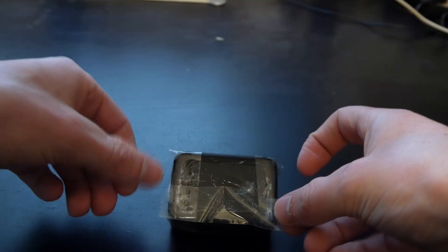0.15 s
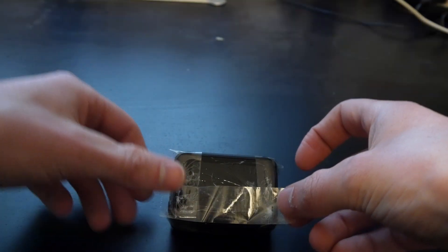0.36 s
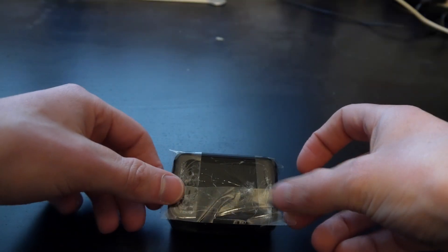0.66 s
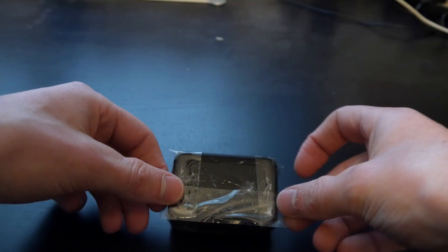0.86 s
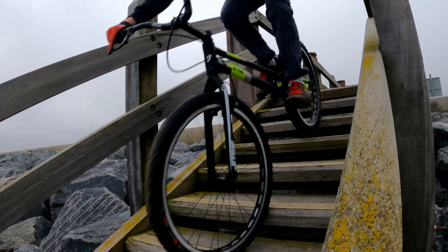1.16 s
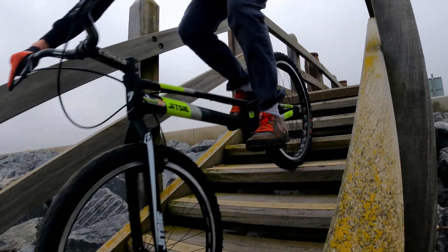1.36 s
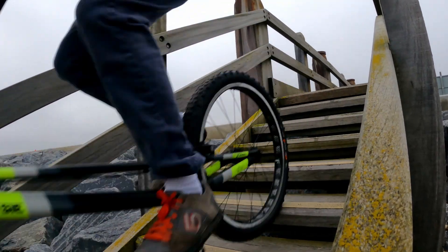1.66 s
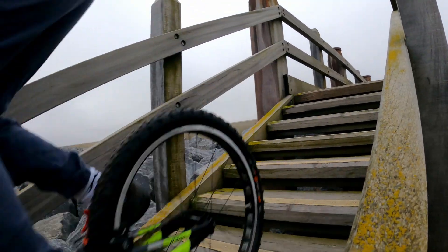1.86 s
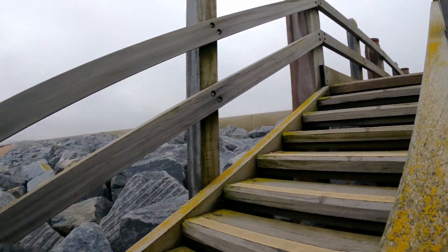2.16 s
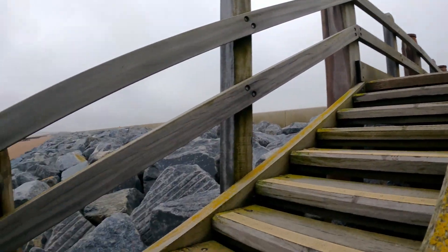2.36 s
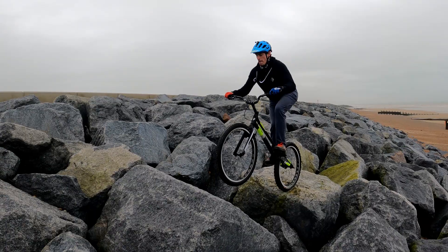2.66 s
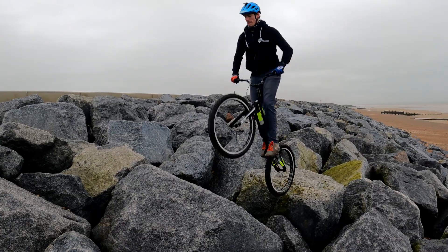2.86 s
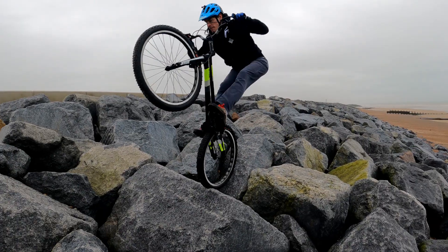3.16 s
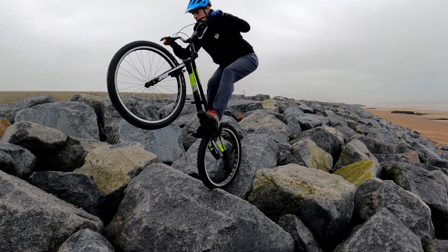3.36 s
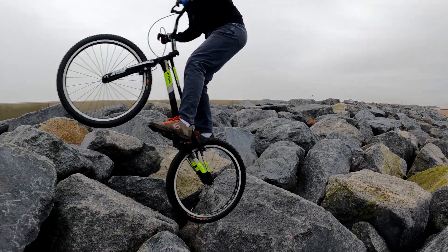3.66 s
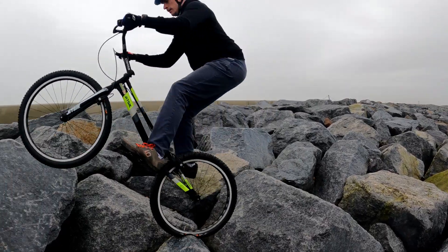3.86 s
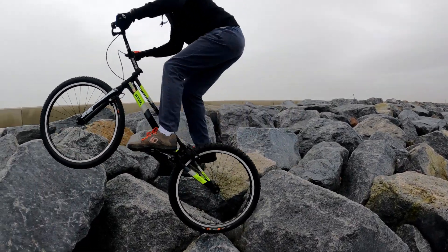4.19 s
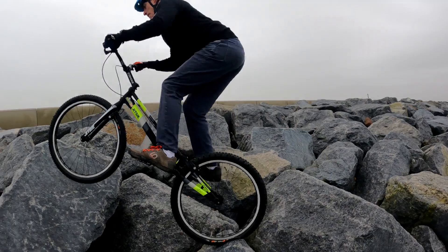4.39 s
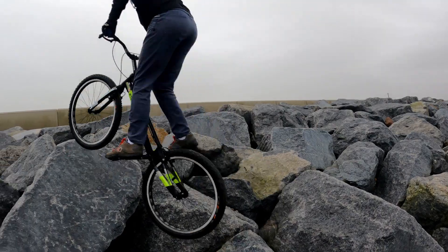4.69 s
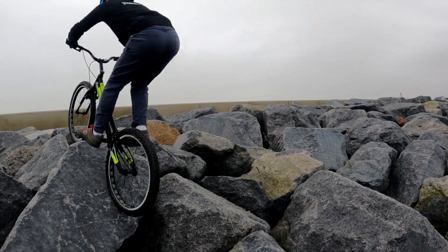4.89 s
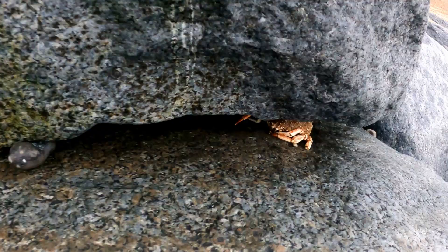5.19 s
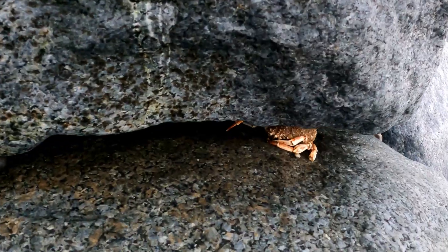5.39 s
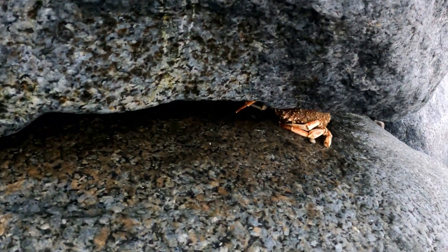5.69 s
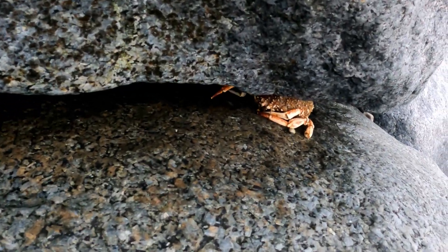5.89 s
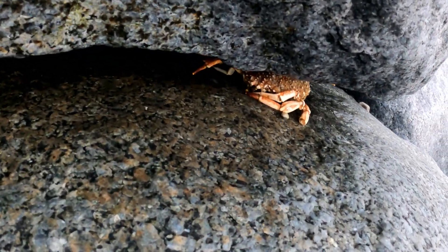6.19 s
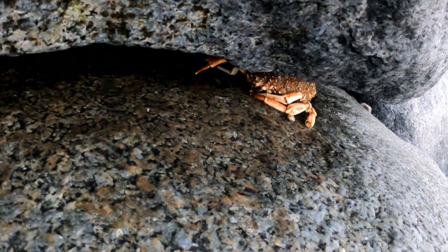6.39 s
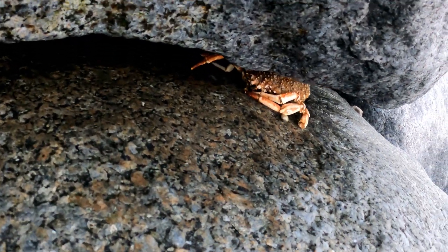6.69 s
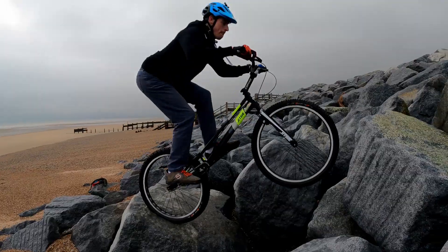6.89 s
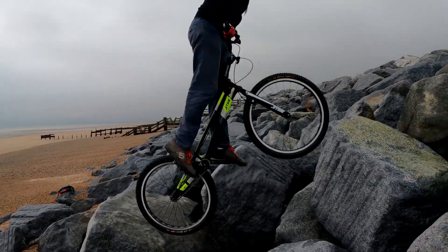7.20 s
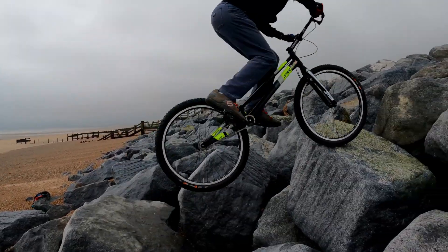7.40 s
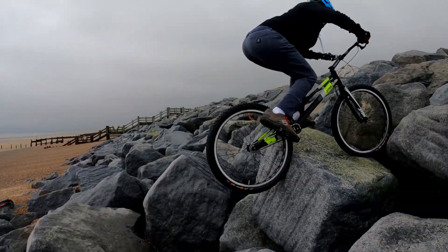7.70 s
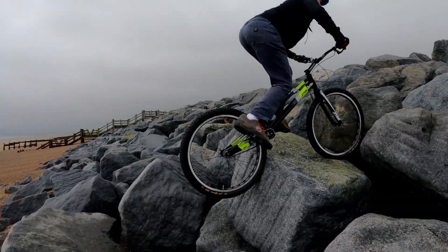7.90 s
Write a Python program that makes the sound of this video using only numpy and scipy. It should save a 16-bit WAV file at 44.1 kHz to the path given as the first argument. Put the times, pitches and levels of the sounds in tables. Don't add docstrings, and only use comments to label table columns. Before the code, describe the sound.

Close, raw outdoor sound after a second of room hum with tape crackles and one soft thump. Bike pads squeal around one kilohertz as tyres thud and loose parts rattle down planks. Gusting wind opens the boulder section, with squeals, rim knocks, chain clacks and whirring freewheel. Low sea drone and crab scrabbles follow, then more hopping and a last harsh shriek of brakes.

```python
import sys
import numpy as np
from scipy import signal
from scipy.fft import rfft, irfft
from scipy.io import wavfile

SR = 44100
rng = np.random.default_rng(int(sys.argv[2]) if len(sys.argv) > 2 else 0)


def dump(signal):
    limited = np.clip(np.atleast_2d(signal).T, -1, 1)
    pcm = np.round(limited * 32767).astype(np.int16)
    wavfile.write(sys.argv[1], SR, pcm)


def rack_gain(trim_db):
    fader = np.asarray(trim_db, float)
    return 10 ** (fader / 20)


N = 355005

CUT_S, CRANNY_S = 2.427, 5.2288


def rms_one(x):
    return x / np.sqrt(np.mean(x ** 2) + 1e-20)


def peak_one(x):
    return x / np.abs(x).max()


def in_time(rows, fade=0.003):
    s, *columns = np.transpose(rows)
    t = np.arange(N) / SR
    gate = np.clip(np.minimum(t - s[0], s[-1] - t) / fade + 1, 0, 1)
    return [gate] + [np.interp(t, s, c) for c in columns]


def drift(rate, size=None):
    size = size or N
    knots = rng.standard_normal(int(N / SR * rate) + 3)
    return 1.24 * np.interp(np.arange(size) * rate / SR, np.arange(len(knots)), knots)


def coloured(x, spectrum):
    hz, db = np.transpose(spectrum)
    grid = np.fft.rfftfreq(N, 1 / SR) + 1
    gain = rack_gain(np.interp(np.log(grid), np.log(hz), db))
    return rms_one(irfft(rfft(x) * gain, N))


def band(x, low_hz, high_hz):
    return rms_one(signal.sosfilt(signal.butter(2, [low_hz, high_hz], "band", fs=SR, output="sos"), x))


def dull(x, top_hz):
    return signal.sosfilt(signal.butter(4, top_hz, fs=SR, output="sos"), x)


def resonance(x, hz, width_hz):
    r = np.exp(-np.pi * np.clip(width_hz, 5, 9000) / SR)
    return signal.lfilter(np.array([1, 0, -1]) * (1 - r * r) / 2, [1, -2 * r * np.cos(2 * np.pi * hz / SR), r * r], x)


def grains(per_s, spread_db, size=None):
    chance, size_draw, sign_draw = rng.random((3, size or N))
    loudness = rack_gain(-spread_db * np.log(size_draw + 0.0012))
    return (chance < per_s / SR) * loudness * np.sign(sign_draw - .5)


def add(out, s, piece):
    at = round(s * SR)
    out[at:at + len(piece)] += piece[:N - at]


def brakes():
    # start in seconds, length in seconds, first and last pitch in Hz, level in dB.
    pure = [(1.441, 0.041, 1150, 1139, -10), (1.624, 0.041, 1142, 1160, -9),
            (1.787, 0.045, 1157, 1135, -13.5), (1.789, .04, 1080, 1080, -22.5),
            (1.843, 0.046, 1155, 1152, -21), (1.843, .048, 1092, 1090, -27.5), (2.02, .04, 898, 800, -24.5),
            (2.178, 0.032, 828, 824, -16), (5.223, 0.01, 899, 900, -18)]
    rough = [(2.914, 0.027, 950, 980, -25), (3.205, 0.027, 1039, 1080, -17.5),
             (3.247, 0.022, 1080, 1130, -20), (3.27, 0.017, 1157, 1170, -25.5),
             (3.203, .022, 800, 830, -24.5), (3.548, 0.024, 1192, 1258, -18),
             (3.752, 0.038, 1050, 1000, -21), (3.755, .02, 600, 603, -28.5), (3.788, .03, 800, 880, -33),
             (3.535, 0.04, 803, 603, -32), (7.128, 0.055, 1000, 996, -16), (7.128, .02, 905, 930, -22),
             (7.155, 0.032, 900, 848, -21), (7.225, .018, 802, 763, -25), (7.26, 0.022, 986, 1002, -13.5),
             (7.282, .012, 954, 907, -21)]
    octave = [(1.815, 0.041, 1150, 1140, -21), (2.052, 0.029, 821, 776, -14), (4.64, 0.055, 1005, 908, -16),
              (7.183, 0.0359, 900, 730, -18), (5.024, 0.049, 1187, 1170, -20.5)]
    shrieks = [(7.481, .092, 1165, 1100, -18.5)]
    afterring = [(3.795, .045, 1030, 1030, -33), (3.885, 0.028, 1100, 1020, -34),
                 (3.93, 0.081, 1100, 1110, -39), (3.79, 0.045, 2050, 2050, -32.5),
                 (3.86, .075, 2300, 2100, -40), (4.7, 0.13, 1850, 1800, -40.5),
                 (7.29, .045, 2000, 2040, -30), (7.338, .06, 2030, 1980, -39),
                 (7.305, .04, 1010, 1020, -35), (5.07, 0.077, 1175, 1165, -31.5),
                 (5.07, 0.073, 2350, 2330, -37), (3.29, 0.054, 1300, 1170, -38),
                 (1.19, 0.039, 1080, 1080, -29), (1.473, .055, 2300, 2280, -33.5),
                 (1.66, 0.044, 2310, 2300, -31.5)]
    groans = [(2.921, .026, 930, 660, -24.5), (3.744, 0.025, 800, 800, -26.5),
              (3.764, 0.022, 1030, 1020, -25.5), (3.563, 0.0244, 880, 740, -31.5),
              (3.198, 0.0139, 1000, 790, -29), (7.195, .028, 790, 740, -23), (7.15, 0.036, 1010, 960, -31)]
    yelps = [(7.626, .04, 1153, 1202, -17.5)]
    bright = [(1.094, 0.047, 1080, 1083, -13.5), (1.143, 0.043, 1068, 1073, -23),
              (1.97, 0.02, 1130, 1151, -18), (1.996, 0.066, 1090, 1030, -14.5),
              (1.996, .025, 1165, 1150, -20), (2.174, 0.051, 1064, 1040, -18.5)]
    # 2nd and 3rd partial against the level in dB, unevenness in dB,
    # fading of the 1st partial in dB, share of the length at which overtones peak, attack in seconds,
    # extra loss per partial in dB, pitch tremble as a share, lateness of the glide, wilting of overtones in dB.
    grips = [
        (-16, -22, 1.5, 3.5, 0.7, 0.008, -10, 0.0092, 1.15, 10),
        (-7, -14, 3.5, 6.7, 0.41, 0.0058, -3, .026, 1.14, 9.1),
        (-3, -12.5, 2.5, 5, 0.6, 0.011, -3.5, .015, 1.15, 11),
        (-1, 2.5, 2.2, 4.7, 0.4, 0.015, -0.6, 0.0067, 2.2, 18.5),
        (-29, -40, 3.1, 8.7, .45, 0.0089, -9, .012, 1.15, 12),
        (8.5, -5.5, 2.4, 9.1, 0.49, 0.0088, -1, .02, 1.14, 9.1),
        (-6, -3.5, 2, 5, .36, .008, -1, .008, 2.5, 20),
        (-9.5, -14, 1.8, 3, 0.37, .009, -7.5, .012, 1.15, 5.6),
    ]
    overtones_db = [-4.5, -9, -11.5, -11.5, -12.5, -34, -54, -30.5, -34]
    bloom_db = 11
    out = np.zeros(N)
    for rows, grip in zip((pure, rough, octave, shrieks, afterring, groans, yelps, bright), grips):
        second_db, third_db, rough_db, fade_db, bloom_share, attack, upper_db, tremble, late, wilt_db = grip
        for s, length, from_hz, to_hz, db in rows:
            t = np.arange(round((length + .06) * SR)) / SR
            done = np.minimum(t / length, 1)
            hz = from_hz + (to_hz - from_hz) * done ** late
            bloom = db + np.interp(done, [0, np.clip(bloom_share, .05, .95), 1], [-bloom_db, 0, -wilt_db])
            levels = [db - fade_db * done ** 2, bloom + second_db, bloom + third_db]
            levels += [levels[2] + upper_db * (k + 1) + v for k, v in enumerate(overtones_db)]
            phase = 2 * np.pi * np.cumsum(hz * (1 + tremble * drift(254.0, size=len(t)))) / SR
            tone = 0
            for k, level in enumerate(levels):
                uneven_db = rough_db * (1 + 0.092 * k) * drift(157, size=len(t))
                tone = tone + rack_gain(level + uneven_db) * np.cos((k + 1) * phase + k * 2.0)
            rasp = band(rng.standard_normal(len(t)), 650, 2540) * (1 + 0.27 * np.cos(phase))
            rasp_gain = rack_gain(levels[0] - 38.5 + 7.6 * rough_db) + rack_gain(levels[2] - 30.0)
            envelope = np.clip(t / attack, 0, 1) * rack_gain(-60 * np.maximum(t - length, 0) / 0.014)
            add(out, s, envelope * (np.sqrt(2) * tone + rasp_gain * rasp))
    return out


def knocks():
    # time in seconds, peak in dB, centre in Hz,
    # bright rattle against the peak in dB, hold in seconds.
    scrapes = [(1.027, -40, 2170, -24, 0.021), (1.0854, -20.5, 2110, -38, 0.0089),
               (1.258, -21, 1300, -12, 0.025), (1.422, -18, 1390, -16, 0.02),
               (1.607, -22.5, 1450, -23, 0.025), (1.735, -27, 2330, -5, 0.014),
               (1.785, -19, 2230, -11.5, 0.017), (1.9066, -21.5, 2110, -10.5, 0.028),
               (1.9729, -14.5, 1700, -16, 0.02), (2.0634, -13.5, 1590, -9, 0.021),
               (2.157, -15.5, 1410, -26, 0.016), (2.275, -16, 3300, -40, 0.02),
               (2.29, -18.5, 560, -30, .022), (2.157, -24, 470, -30, .01),
               (2.3184, -25.5, 4060, -7, 0.019), (2.4, -16.5, 1700, -16, 0.01),
               (2.416, -18, 1390, -16, .012),
               (2.7641, -20.5, 2000, -29, 0.016), (2.93, -14.5, 1500, -17.5, 0.018),
                       (3.1997, -16, 1300, -30, 0.018), (3.24, -18, 1600, -13, 0.0047),
                       (7.165, -20, 2900, -14, .02), (7.61, -20, 2200, -20, 0.014),
                       (3.2674, -36, 2200, -18, 0.025), (3.56, -12, 1720, -19, 0.023),
                       (3.7555, -12.5, 1540, -30, 0.025), (3.838, -25, 4500, -13, 0.014),
                       (4.4473, -30, 1420, -5, 0.019), (4.6958, -16.5, 1430, -19, 0.016),
                       (4.9028, -21, 1770, -12, 0.024), (4.99, -15, 4600, -16, 0.007),
                       (6.848, -27, 3000, -11, 0.012), (7.11, -35, 1740, -5, 0.0075),
                       (7.1326, -18, 1880, -32, 0.02), (7.203, -13.5, 1600, -10, 0.018),
                       (7.2634, -15.5, 1940, -25, 0.014), (7.4257, -29.5, 2950, -7, 0.033),
                       (7.555, -20.5, 2140, -8, 0.026), (7.6, -18, 1800, -27, 0.025),
                       (7.624, -12.5, 1750, -22, 0.016), (7.635, -15.5, 3440, -6.5, 0.02),
                       (7.66, -30, 2507, -13, 0.01), (7.684, -19.5, 900, -16, 0.007),
                       (7.998, -33, 2080, -8, 0.031)]
    # time in seconds, peak in dB, centre in Hz,
    # bright rattle and low knock against the peak in dB.
    clacks = [(3.475, -31.5, 2520, -2.5, -6), (3.8573, -11.5, 2400, -9.5, -26),
              (3.944, -22, 3716, -19, -17), (4.0563, -15, 3100, -31, -22), (4.145, -22, 4320, -18, -28),
              (4.1767, -22, 2900, -23, -11), (4.3185, -40.5, 2080, 0, -10), (4.358, -21, 2600, -13, -27),
              (4.4066, -15, 2620, -20, -3.5), (4.466, -31, 3300, -10, -20), (4.5061, -22, 3580, -13.5, -8),
              (4.55, -20, 4620, -11, -21), (4.593, -34, 2150, -4, -4), (4.6349, -22.5, 2910, -35, 10),
              (4.966, -10.5, 2260, -22, -4.5), (5.226, -26, 1500, -30, -6), (6.864, -28, 6000, -20, -20),
              (6.876, -15, 2560, -10, -26), (6.917, -30.5, 5800, -15, -15), (7.3983, -32, 2090, -7, -16),
              (7.7994, -45, 2370, -8, 3), (7.894, -44, 2030, -12, -4)]
    # pitch in Hz, width in Hz, level in dB.
    frame = [(716, 180, 17), (1026, 227, 12), (1521, 188, 13), (2140, 530, 4), (2780, 236, 4.5),
             (3794, 460, 1), (4554, 150, 3.5), (5380, 360, -0.5)]
    out, t = np.zeros(N), np.arange(round(.25 * SR)) / SR
    rows = [(*row, -13) for row in scrapes]
    rows += [(s, db, hz, bright_db, .0025, low_db) for s, db, hz, bright_db, low_db in clacks]
    for s, db, hz, bright_db, held, low_db in rows:
        swell = np.clip(t / (0.66 * held), 0, 1) ** 0.82
        envelope = swell * rack_gain(-60 * np.maximum(t - held, 0) / (0.056 + 3.1 * held))
        spray = envelope * rms_one(grains(6000, 3.1, size=len(t)))
        if held < .006:
            spray[round(.45 * held * SR)] += 5.0
        strengths, bend = rng.normal(0, 1.53, len(frame)), 1 + rng.normal(0, 0.074)
        rung = 0
        for k, ((f, w, g), v) in enumerate(zip(frame, strengths)):
            rung = rung + rack_gain(g + v) * resonance(spray, f * bend, w) * (-1) ** k
        body = peak_one(resonance(resonance(rung + 0.14 * spray, hz, 1.13 * hz), hz, 10.0 * hz))
        rattle = peak_one(resonance(resonance(spray, 4270, 3700), 4200, 5900))
        knock = peak_one(resonance(resonance(spray, 870, 640), 870, 640))
        add(out, s - .45 * held, rack_gain(db) * (body + rack_gain(bright_db + 5.0) * rattle + rack_gain(low_db) * knock))
    return out


def wheel_ring(bike):
    # pitch in Hz, width in Hz, level in dB.
    rim = [(1080, 14, -29.5), (2080, 17, -19)]
    return 4.8 * sum(rack_gain(db) * resonance(bike, hz, w) for hz, w, db in rim)


def rocks(x):
    t = np.arange(round(.5 * SR)) / SR
    tail = grains(1500, 3.5, size=len(t)) * rack_gain(-60 * t / 0.17) * (t > .008)
    echoes = dull(band(tail, 210, 3200), top_hz=2900) / np.sqrt(len(t))
    return rack_gain(-23) * signal.fftconvolve(x, echoes)[:N]


def snaps(rows, t60, spread):
    out, t = np.zeros(N), np.arange(round(.04 * SR)) / SR
    for s, db, hz in rows:
        piece = resonance(rng.standard_normal(len(t)) * rack_gain(-60 * t / t60), hz, spread * hz)
        add(out, s, rack_gain(db) * peak_one(piece))
    return out


def freewheel_ticks():
    # time in seconds, peak in dB, centre in Hz.
    ticks = [(2.5631, -32, 4230), (2.589, -31, 5200), (2.6185, -34, 5240), (2.6463, -31, 5300),
             (2.6825, -33.5, 4530), (2.821, -41, 4040), (3.332, -51, 4340), (3.4166, -46, 5510),
             (4.119, -40, 4500), (4.2106, -32, 4500)]
    return snaps(ticks, t60=0.064, spread=0.13)


def freewheel_whirr():
    # start, loudest moment and end in seconds, loudest level in dB, last level in dB.
    spins = [
        (2.97, 3.145, 3.42, -44.5, -60),
        (3.577, 3.69, 3.83, -42, -52.5),
        (4.705, 4.902, 4.97, -44, -44.5),
    ]
    # pitch in Hz, level per Hz in dB.
    fizz_colour = [(880, -46), (1500, -3.5), (2430, -9.5), (3000, -7), (3430, -11), (4810, -4.5),
                   (7790, -14.5), (15000, -31)]
    spin_per_s, caught_per_s = 110, 120
    out, fizz = 0, coloured(rng.standard_normal(N), fizz_colour)
    for start, top, end, db, last_db in spins:
        rows = [(start, db - 13, spin_per_s), (top, db, spin_per_s), (end, last_db, caught_per_s)]
        gate, level_db, per_s = in_time(rows, fade=0.019)
        since_skip = np.cumsum(per_s * (1 + 0.058 * drift(60))) / SR % 1
        out = out + gate * rack_gain(level_db + 11.5) * (0.39 + 0.91 * np.exp(-4.5 * since_skip)) * fizz
    return out


def rubs():
    # start, loudest moment and end in seconds, loudest level in dB.
    drags = [(3.238, 3.275, 3.34, -40), (3.467, 3.525, 4, -42), (4.037, 4.065, 4.17, -48),
             (4.132, 4.18, 4.3, -44), (4.27, 4.3, 4.35, -57), (4.33, 4.372, 4.55, -46),
             (4.39, 4.43, 4.6, -42), (4.49, 4.545, 4.66, -43.5), (4.638, 4.674, 4.95, -37),
             (4.96, 5.006, 5.12, -35.5), (5.15, 5.223, 5.25, -49), (6.82, 6.88, 6.9, -41.5),
             (7.477, 7.555, 7.73, -32), (7.57, 7.638, 7.76, -32.5)]
    # pitch in Hz, level per Hz in dB.
    hiss_colour = [(300, -21), (800, -2), (2500, -1), (5000, -7), (9000, -16), (15000, -19.5)]
    edge_db = 18.5
    swell = 0
    for start, top, end, db in drags:
        gate, level_db = in_time([(start, db - edge_db), (top, db), (end, db - edge_db)], fade=0.01)
        swell = swell + gate * rack_gain(level_db)
    return swell * coloured(grains(6000, 3.0) * rack_gain(3.8 * np.tanh(drift(90))), hiss_colour)


def housing(bike):
    leak_hz, leak_width_hz = 13900, 2900
    leak = resonance(resonance(bike, leak_hz, leak_width_hz), leak_hz, leak_width_hz)
    muffled = dull(bike, top_hz=9940) + rack_gain(-9.5) * leak
    return muffled - 0.51 * resonance(muffled, 11570, 2200)


def steps():
    # time in seconds, jolting in dB.
    jolts = [(1.024, -44.5), (1.11, -48), (1.19, -47), (1.26, -42), (1.33, -49), (1.43, -42), (1.47, -53.5),
             (1.53, -47), (1.628, -41.5), (1.662, -65), (1.772, -46.5), (1.99, -45), (2.015, -51),
             (2.095, -55), (2.115, -45.5), (2.2, -46.5), (2.25, -52.5), (2.264, -47.5), (2.294, -37.5),
             (2.372, -56.5), (2.395, -51), (2.427, -35)]
    # pitch in Hz, level per Hz in dB.
    rattle_colour = [(410, 3), (700, 9), (873, 5), (1090, 10), (1520, -1), (2250, -0.5), (4300, -6.5),
                     (8990, -21), (15500, -66.5)]
    # pitch in Hz, width in Hz, level in dB.
    planks = [(111.5, 7.7, -5)]
    gate, jolt_db = in_time(jolts)
    tread = band(rng.standard_normal(N) * rack_gain(8.4 * np.tanh(drift(50))), 340, 580)
    rattle = coloured(grains(6000, 3.0) * rack_gain(4.5 * np.tanh(drift(70))), rattle_colour)
    shake = rng.standard_normal(N) * rack_gain(1.7 * np.tanh(drift(22.35)) + 1.8 * np.tanh(drift(60)))
    boom = rms_one(sum(rack_gain(db) * resonance(shake, hz, w) for hz, w, db in planks))
    boom = boom + 0.077 * band(shake, 81, 150)
    tread_db = -39 + 2.26 * (jolt_db + 45)
    boom_db = -28 - 22.5 * np.maximum(np.arange(N) / SR - 1.97, 0)
    return gate * (rack_gain(tread_db) * tread + rack_gain(jolt_db + 13.5) * rattle + rack_gain(boom_db) * boom)


def thumps():
    # time in seconds, peak in dB, time to die by 60 dB in seconds.
    blows = [(0.492, -9, 0.12), (1.201, -17, 0.53), (1.05, -21.5, 0.11), (1.166, -23, .06),
             (1.262, -20, .12), (1.315, -23, .1), (1.378, -20, .08), (1.42, -18.5, 0.11),
             (1.778, -20.5, 0.062), (2.107, -24, .08), (7.662, -23, .06), (1.61, -21.5, 0.11),
             (1.95, -20.5, 0.15), (3.44, -14, 0.13), (3.473, -14, 0.12), (3.495, -14, 0.11),
             (6.235, -18.5, 0.32), (6.268, -21, 0.26), (6.376, -24, 0.1), (7.682, -13, 0.07)]
    # pitch in Hz, level in dB, ringing time in seconds (9 over it is the width in Hz).
    modes = [(100, 6.5, 0.14), (180, 6.5, 0.19), (339, -8.5, 0.16), (400, 0, 0.084), (578, -12.5, 0.15),
             (854, -4, 0.18)]
    out, t = np.zeros(N), np.arange(round(.3 * SR)) / SR
    for s, db, t60 in blows:
        shake = dull(rng.standard_normal(len(t)) * rack_gain(-60 * t / t60), top_hz=754)
        piece = sum(rack_gain(g) * rms_one(resonance(shake, f, 9 / d)) for f, g, d in modes)
        top_hz = 1000 if s < 1 else 420
        add(out, s, rack_gain(db) * peak_one(dull(piece, top_hz=top_hz)))
    return out


def tape():
    # time in seconds, peak in dB, centre in Hz.
    jerks = [(0.326, -18.5, 4000), (0.3484, -23, 5500), (0.4683, -48, 6080), (0.5567, -34.5, 5240),
             (0.6734, -35.5, 5090), (0.7108, -34, 5350), (0.724, -32, 5600), (0.752, -37, 5220),
             (0.7985, -37, 5300), (0.837, -26, 9200), (0.8639, -40, 5310)]
    return snaps(jerks, t60=0.011, spread=0.67)


def crab():
    # start in seconds, end in seconds, level in dB.
    spurts = [
        (6.237, 6.347, -47),
        (6.378, 6.46, -46.5),
    ]
    # time in seconds, peak in dB.
    slips = [(6.236, -30), (6.287, -12), (6.2985, -12.5), (6.322, -32), (6.39, -23), (6.407, -21),
             (6.427, -26), (6.447, -28)]
    # pitch in Hz, width in Hz, level in dB.
    hollows = [(1300, 298, 5.5), (2000, 500, 1), (2660, 400, 4), (3450, 580, 2.5), (4600, 600, -4),
               (6230, 430, -2), (6900, 470, -6), (8700, 2200, -23)]
    force = sum(rack_gain(db) * in_time([(start,), (end,)], fade=0.02)[0] for start, end, db in spurts)
    t = np.arange(round(.04 * SR)) / SR
    for s, db in slips:
        add(force, s, rack_gain(db - 12) * np.clip(t / 0.0021, 0, 1) * rack_gain(-60 * t / 0.039))
    grit = grains(7000, 2.5) * rack_gain(2.3 * np.tanh(drift(80)))
    rung = sum(rack_gain(db) * resonance(grit, hz, w) * (-1) ** k for k, (hz, w, db) in enumerate(hollows))
    return dull(force * rms_one(rung), top_hz=11000)


def wind():
    # time in seconds, rumble in dB.
    rumble_level = [(1.02, -45), (1.04, -40), (1.41, -30.5), (2.37, -39), (2.53, -19.5), (3.21, -31),
                    (3.41, -37.5), (3.45, -22.5), (4.03, -44.5), (4.27, -27), (4.91, -36.5), (4.99, -28.5),
                    (5.76, -47), (5.89, -34.5), (7.58, -46.5), (7.68, -30), (7.77, -50), (8.05, -43.5)]
    # time in seconds, level in dB, half length in seconds.
    gusts = [(2.448, -14, .07), (3.028, -28, 0.061), (2.596, -24.5, 0.16), (2.803, -23.5, 0.13),
             (3.221, -29, 0.043), (3.477, -21, 0.068), (4.383, -25.5, 0.23), (4.985, -29, .04),
             (7.68, -26, 0.022)]
    gate, wind_db = in_time(rumble_level)
    t = np.arange(N) / SR
    blow = rack_gain(-35.5 + 1.71 * (wind_db + 27))
    for s, db, half in gusts:
        blow = blow + rack_gain(db) * np.clip(1 - ((t - s) / half) ** 2, 0, 1) ** 2
    force = np.clip((20 * np.log10(blow) + 37) / 16, .1, 1)
    lumps = force * 1.1 * np.tanh(drift(22.1))
    rumble = band(rng.standard_normal(N) * rack_gain(2.6 * lumps), 13.2, 86.3)
    eddies = rng.standard_normal(N) * rack_gain(3.1 * lumps + 4.4 * force * np.tanh(drift(60)))
    flutter = force * band(eddies, 64, 226)
    flutter = flutter + (1 - force) * 0.46 * band(eddies, 142.2, 260.0)
    flutter = flutter + 0.14 * force ** 2 * band(eddies, 167, 533)
    return gate * (rack_gain(wind_db + 2.5) * rumble + (t > CUT_S) * 0.72 * blow * flutter)


def sea_drone():
    # time in seconds, level in dB.
    drone_level = [
        (5.232, -37),
        (6.6, -33.5),
        (7.9, -49),
    ]
    near, drone_db = in_time(drone_level)
    swell = near * rack_gain(drone_db) + rack_gain(-50.5)
    drone = band(rng.standard_normal(N) * rack_gain(1.2 * drift(30)), 150.4, 254.0)
    return (np.arange(N) / SR > CUT_S) * swell * drone


def background():
    # time in seconds, surf level in dB.
    surf_level = [(1.02, -68), (2.3, -49.5), (2.6, -39), (3.0, -38.5), (6.05, -43), (7.13, -40),
                  (8.05, -49)]
    # pitch in Hz, level per Hz in dB.
    surf_colour = [(180, -51.5), (300, -5.5), (477, -8), (531, -3.5), (857, -6), (1430, -11.5),
                   (1800, -15.5), (2030, -17.5), (3890, -27.5), (10500, -61.5), (15600, -112),
                   (22000, -120)]
    room_colour = [(15, -32), (25, 4.5), (59, -12), (107, -8), (209, -19.5), (313, -11.5), (552, -25),
                   (919, -10), (1020, -22), (1270, -17.5), (1850, -22), (2920, -21), (5880, -37.5),
                   (8580, -44.5), (15500, -51)]
    gate, surf_db = in_time(surf_level)
    surf = rack_gain(surf_db + 1.5 + 1.0 * drift(16)) * coloured(rng.standard_normal(N), surf_colour)
    room = rack_gain(-42.5 + 0.48 * drift(15.0)) * coloured(rng.standard_normal(N), room_colour)
    return gate * surf + (1 - gate) * room


def scene():
    bike = brakes() + knocks()
    bike = bike + wheel_ring(bike)
    bike = bike + rocks(bike) + freewheel_ticks() + freewheel_whirr() + rubs()
    bike = housing(bike)
    for s in CUT_S, CRANNY_S:
        bike = bike * (1 - in_time([(s + .001,), (s + .09,)], fade=.001)[0])
    mix = bike + steps() + thumps() + tape() + crab() + wind() + sea_drone() + background()
    return mix[None]


def low_pass(x):
    return signal.sosfilt(signal.butter(12, 16510, fs=SR, output="sos"), x)


def record(dry):
    rounded = 0.86 * np.tanh(dry / 0.94)
    return low_pass(dull(rounded, top_hz=15800))


dry = scene()
out = record(dry)
dump(out)
```